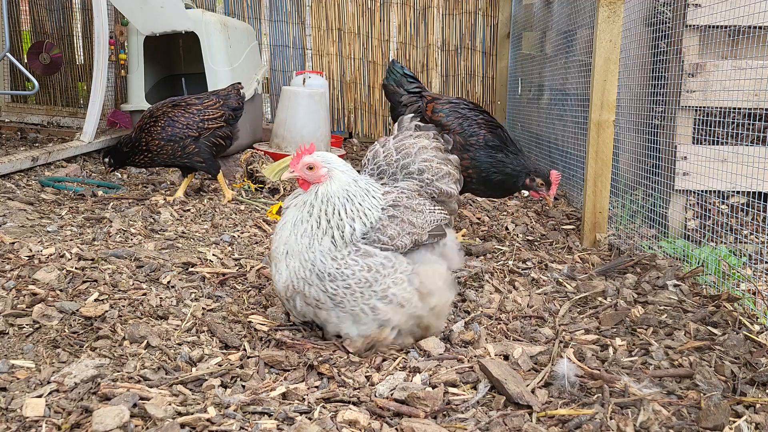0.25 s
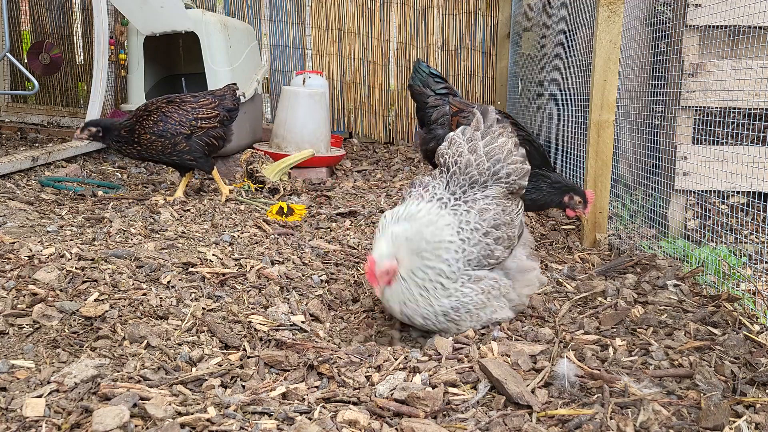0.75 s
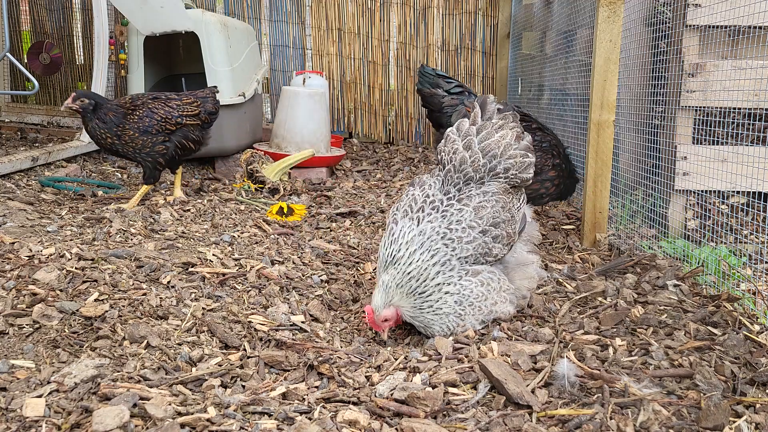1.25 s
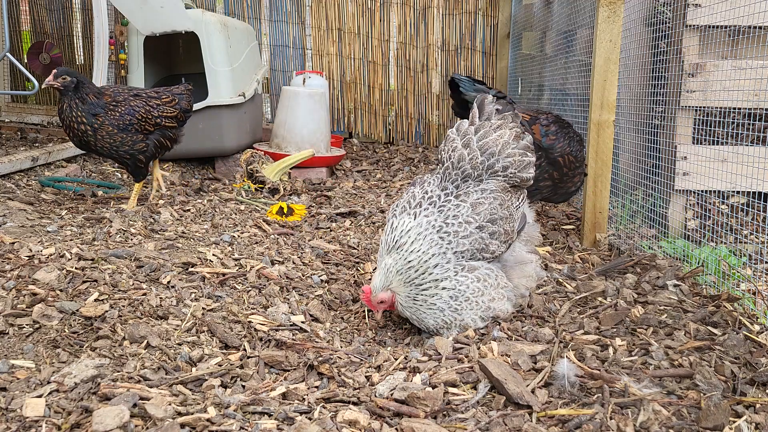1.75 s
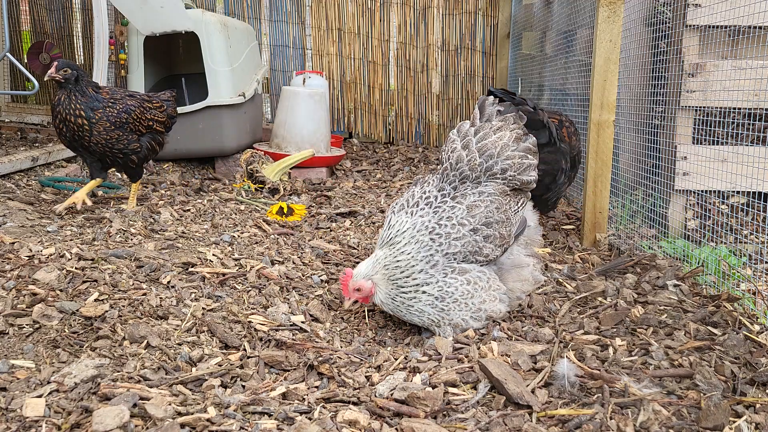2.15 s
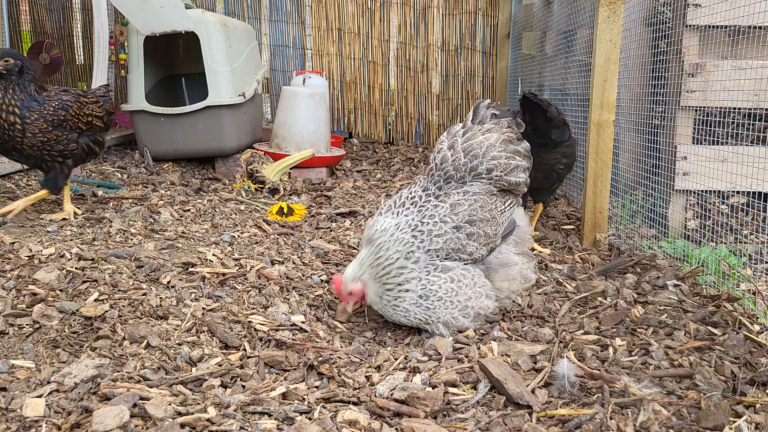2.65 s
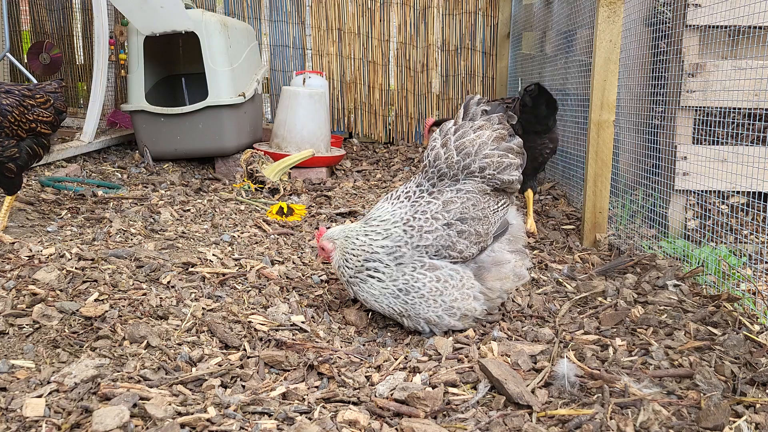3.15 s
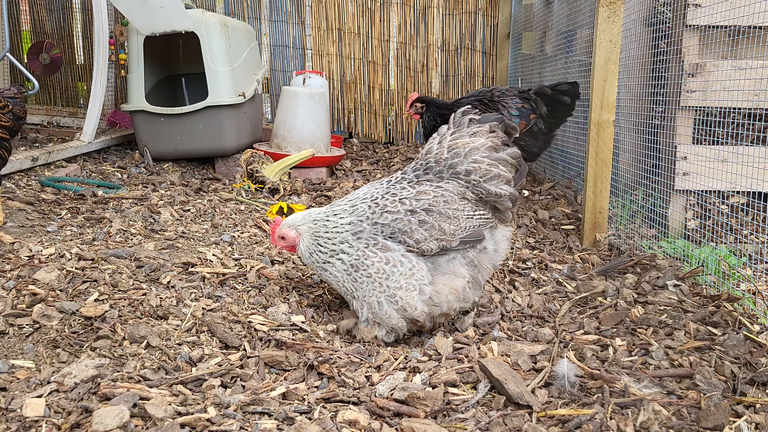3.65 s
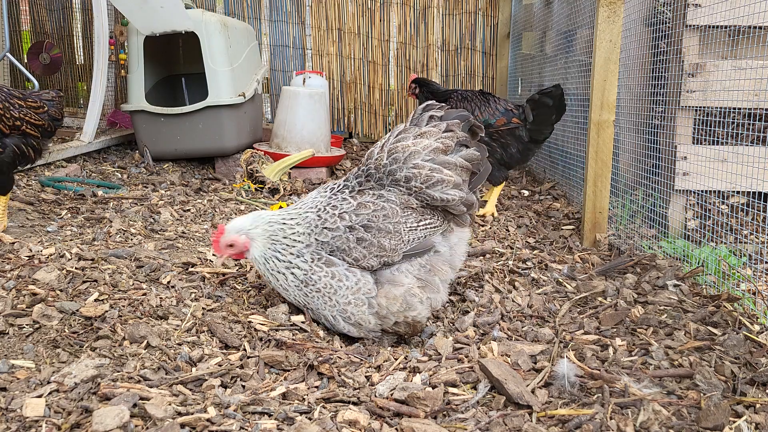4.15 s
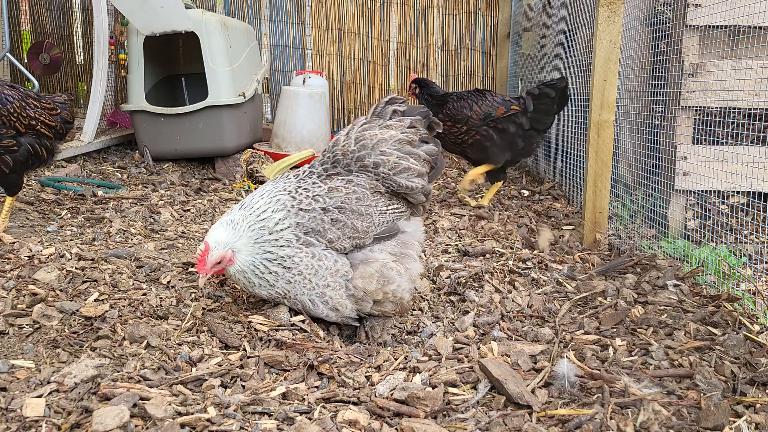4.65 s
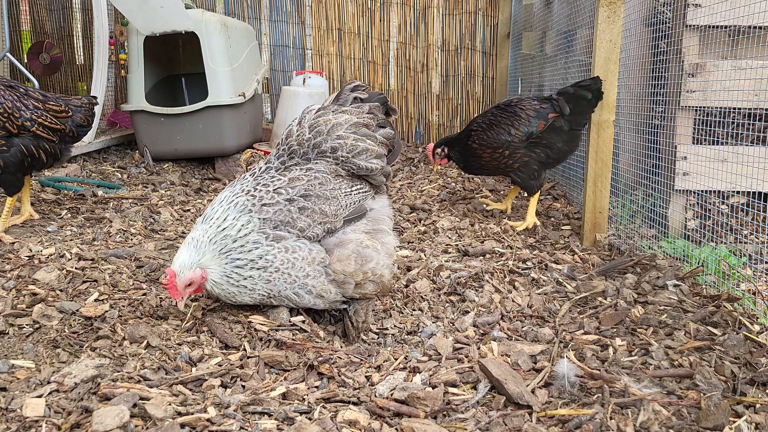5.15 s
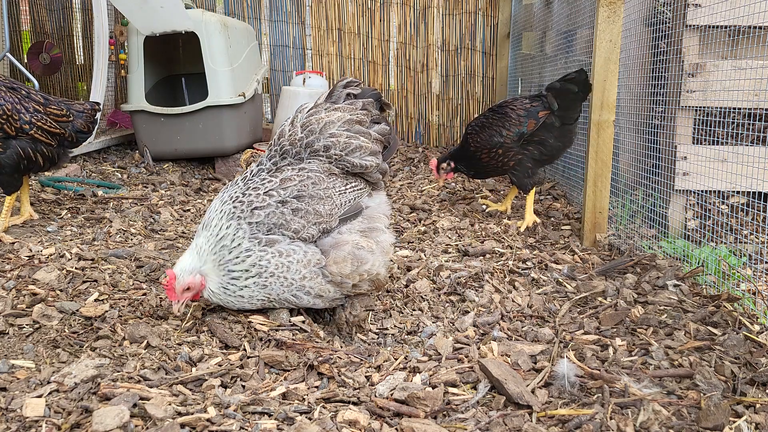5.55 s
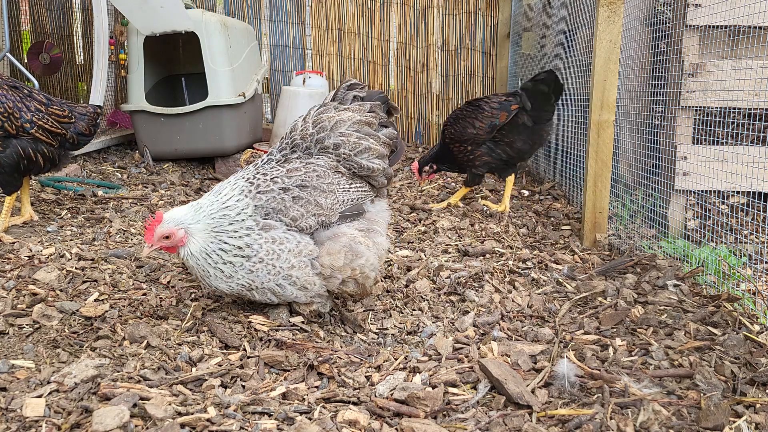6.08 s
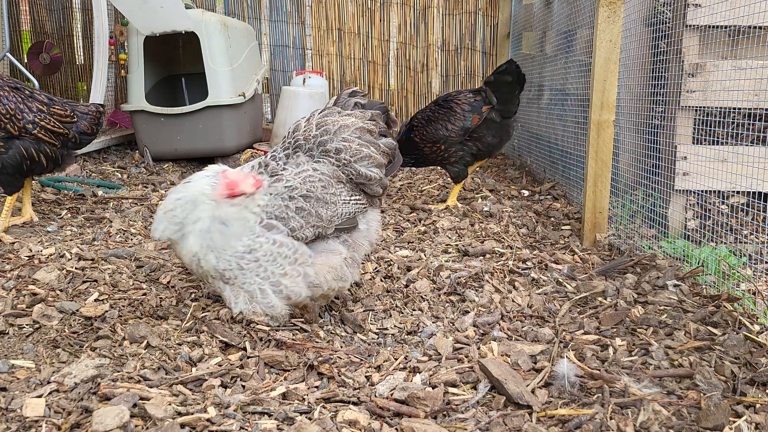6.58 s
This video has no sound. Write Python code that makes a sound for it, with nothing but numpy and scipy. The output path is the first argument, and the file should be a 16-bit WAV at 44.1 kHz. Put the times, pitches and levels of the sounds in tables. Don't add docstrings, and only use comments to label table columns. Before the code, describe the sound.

Crackly bursts of claws raking loose wood chips, a few soft hen peeps, and constant low electrical hum with distant town noise.

```python
import sys
import numpy as np
from scipy import signal
from scipy.fft import rfft, irfft, next_fast_len
from scipy.io import wavfile
from scipy.ndimage import uniform_filter1d

SR = 44100
rng = np.random.default_rng(int(sys.argv[2]) if len(sys.argv) > 2 else 0)


def level_to_linear(level):
    exponent = np.asarray(level, float) / 20
    return 10 ** exponent


def wrap_up_sound(samples):
    columns = np.atleast_2d(samples).T
    tamed = np.clip(columns, -1, 1)
    steps = np.round(tamed * 32767).astype(np.int16)
    wavfile.write(sys.argv[1], SR, steps)


N = 300757
T = np.arange(N) / SR
SIDES = np.array([[1], [-1]])
FAST = next_fast_len(N)
F = np.fft.rfftfreq(FAST, 1 / SR) + 1


def on_log(table, hz):
    f, v = np.transpose(table)
    return np.interp(np.log(hz), np.log(f), v)


def colour(x, table):
    closed = [(table[0][0] * 0.61, -90)] + list(table) + [(table[-1][0] * 1.5, -90)]
    y = irfft(rfft(x, FAST) * level_to_linear(on_log(closed, F)), FAST)[..., :N]
    return y / np.sqrt(np.mean(y ** 2))


def walk(rate):
    k = int(SR / rate)
    held = np.repeat(rng.standard_normal(N // k + 1), k)
    return .7 * uniform_filter1d(uniform_filter1d(held, k), k)[:N]


def pair(alike):
    mid, side = rng.standard_normal((2, N))
    return np.sqrt(1 + alike) * mid + SIDES * np.sqrt(1 - alike) * side


def shower(per_s, spread_db, tail_s, bed, alike):
    sizes = level_to_linear(np.minimum(spread_db * rng.exponential(size=N), 17))
    hits = (rng.random(N) < per_s / SR) * sizes
    env = signal.lfilter([1], [1, -np.exp(-1 / (tail_s * SR))], hits)
    return pair(alike) * (bed + env / np.sqrt(np.mean(env ** 2)))


def strokes(rows, rise_s=.1, fall_s=.1, bed_db=-120):
    swing_db, stop_db = 20, 4
    power, blend = np.full(N, level_to_linear(2 * bed_db)), np.zeros(N)
    for row in rows:
        rise, fall = np.maximum(row[2:4] if len(row) > 2 else (rise_s, fall_s), .002)
        at = slice(max(int((row[0] - 5 * rise) * SR), 0), int((row[0] + 5 * fall) * SR))
        late = T[at] - row[0]
        far = np.where(late < 0, -late / rise, late / fall)
        one = level_to_linear(2 * (row[1] - swing_db * far - stop_db * far ** 4))
        power[at] += one
        blend[at] += one * (row[4] if len(row) > 4 else 0)
    return 10 * np.log10(power), blend / power


# t/s, level/dB
HUM_LEVEL = [(0, -44), (2, -44.5), (4, -44), (5, -44), (6.82, -44.5)]
# multiple of the hum, level below it/dB
HUM_OVERTONES = [(2, -19.5), (3, -37.5), (4, -30.5), (6, -46)]


def hum():
    phase = 2 * np.pi * 100.03 * T
    tone = level_to_linear(0.13 * walk(6)) * np.sin(phase)
    for k, rel_db in HUM_OVERTONES:
        tone = tone + level_to_linear(rel_db + 1.8 * walk(1.5)) * np.sin(k * phase + rng.uniform(0, 2 * np.pi))
    return np.sqrt(2) * level_to_linear(np.interp(T, *np.transpose(HUM_LEVEL)) + SIDES * 0.23) * tone


# f/Hz, level/dB per Hz
TOWN_SPECTRUM = [(50, -23.5), (85, -4.5), (106, -11.5), (124, -13.5), (137, -13), (152, -20), (203, -19),
                 (249, -25), (305, -25.5), (350, -34), (401, -34), (554, -39), (990, -35.5), (1250, -42),
                 (1650, -47), (1900, -51), (5000, -58.5), (6500, -94.5), (11000, -120)]
# f/Hz, level/dB per Hz
AIR_SPECTRUM = [(2350, -22.5), (4000, -8), (5890, -6.5), (7380, -2.5), (8770, -10), (15100, -3.5),
                (15900, -11.5)]
# f/Hz, left minus right/dB
TOWN_LEAN = [(60, -5), (110, 3), (200, 2), (380, 3.5), (700, 3), (1290, 6), (2380, -0.5), (4400, 0),
             (8120, -5.5), (15000, -4.5)]
# f/Hz, share/0-1
TOWN_LIKENESS = [(100, 0.95), (290, 1), (640, 0), (1400, 0), (15000, 0)]
# t/s, mid-band swell/dB
TRAFFIC_SWELL = [(0, 5.5), (1, 2.5), (2, 5), (2.4, 5), (3, 4), (4.5, 3), (5.4, 1), (6.82, 1.5)]


def town():
    alike = np.clip(on_log(TOWN_LIKENESS, F), 0, 1)
    noise = rng.standard_normal((2, N))
    far_town = level_to_linear(-58.5) * colour(noise, TOWN_SPECTRUM)
    air = level_to_linear(-84) * colour(noise[:, ::-1], AIR_SPECTRUM)
    mid, side = rfft(far_town + air, FAST)
    both = np.sqrt(1 + alike) * mid + SIDES * np.sqrt(1 - alike) * side
    both = both * level_to_linear(SIDES * on_log(TOWN_LEAN, F) / 2)
    out, swell, traffic_db = 0, walk(0.25), np.interp(T, *np.transpose(TRAFFIC_SWELL))
    for hz in 88 * 2. ** np.arange(9):
        share = np.cos(np.pi / 2 * np.clip(np.log2(F / hz), -1, 1)) ** 2
        passing = np.exp(-np.log2(hz / 800) ** 2 / 4.4) * traffic_db
        out = out + level_to_linear(0.24 * swell + 1.6 * walk(8.8) + passing) * irfft(both * share, FAST)[:, :N]
    return out


def fine_dust():
    return shower(per_s=160, spread_db=-1.5, tail_s=0.0013, bed=2.2, alike=0.0528)


# peak t/s, level/dB, rise/s, fall/s
FAR_SHUFFLES = [(0, -60, .01, 0.0062), (.045, -72, 0.048, 0.68), (.172, -63, 0.059, 0.049),
                (.3, -72, .25, .03), (1.0, -78, .1, .2), (1.296, -77, .016, 0.7),
                (1.552, -72.5, 0.041, 0.19), (1.946, -71.5, 0.08, 0.11), (2.368, -74.5, 0.22, 0.091),
                (3.1, -77.5, .045, 0.39), (3.364, -78, 0.17, 0.12), (3.48, -77, 0.33, 0.045),
                (4.336, -78.5, .06, .09), (4.49, -73, 0.0094, .3), (5.64, -72.5, 0.026, 0.12),
                (5.804, -73, .02, 0.098), (5.99, -76.5, 0.22, 0.11), (6.204, -73.5, 0.28, 0.13),
                (6.608, -75.5, 0.14, 0.23), (6.82, -81.5, .03, 0.035)]


def shuffles():
    spectrum = [(4500, -15.0), (6000, -7.5), (7200, -1.0), (8200, -10.5), (11000, -13.5), (15500, -12.0)]
    level_db = strokes(FAR_SHUFFLES)[0] + 1.36 * walk(23) - SIDES * 2.2
    return level_to_linear(1.0 + level_db) * colour(fine_dust(), spectrum)


# f/Hz, level/dB per Hz
SOIL_SPECTRUM = [(11, -49.5), (18, -20.5), (46, 2.5), (70, 6), (82, -12.5), (92, -11), (120, -34),
                 (200, -120)]
# peak t/s, level/dB
FOOTFALLS = [(.06, -44), (.42, -52.5), (1.41, -53), (1.62, -48.5), (2.4, -45.5), (2.71, -63), (3.41, -60.5),
             (3.8, -46), (3.98, -47), (4.15, -48.5), (4.35, -48), (4.54, -50), (6.37, -55.5)]
# centre t/s, peak level/dB, f/Hz, half length/s
SOIL_THUMPS = [
    (2.35, -36.5, 55.4, .035),
    (2.398, -40, 62, .03),
    (3.765, -34.5, 139, 0.027),
    (3.797, -35.5, 70, 0.041),
    (3.828, -31, 68, 0.019),
    (3.872, -33, 123.5, 0.046),
    (3.955, -32.5, 94, 0.04),
    (4.025, -39.5, 65.6, .04),
    (4.165, -43, 130, .025),
]


def ground():
    deep_db = strokes(FOOTFALLS, rise_s=.2, fall_s=.2984, bed_db=-58)[0]
    deep = level_to_linear(deep_db + SIDES * .8) * colour(pair(0.88), SOIL_SPECTRUM)
    shake = uniform_filter1d(uniform_filter1d(rng.standard_normal((2, N)), size=900), size=300)
    for s, db, hz, length in SOIL_THUMPS:
        u = np.clip((T - s) / length, -1, 1)
        cycles = np.cos(2 * np.pi * hz * (T - s) + 18 * shake)
        deep = deep + level_to_linear(db) * np.cos(np.pi / 2 * u) ** 2 * cycles
    return deep


# t/s, peak level/dB, f/Hz, left minus right/dB
CHIP_SNAPS = [(0.0434, -51, 6800, -8), (0.049, -52.5, 7130, -2), (0.166, -43.5, 7380, -3),
              (0.2543, -48, 8450, -2), (0.2763, -50, 6500, -6), (0.3365, -46, 4840, 3),
              (0.3543, -38.5, 7900, 6), (0.4084, -37.5, 4890, 1), (0.453, -42, 5600, -1),
              (0.4884, -48, 7800, -3.5), (0.5501, -38.5, 5300, -3.5), (0.5592, -35.5, 7700, -1),
              (0.596, -40, 11900, -12.5), (0.627, -48, 8000, -4.5), (0.6742, -29.5, 6240, -2),
              (0.7505, -41, 5380, -4), (0.7857, -38, 7010, 5), (0.8204, -38, 7300, 2),
              (2.7785, -43.5, 6600, -4), (3.5627, -41.5, 7300, 0), (3.6014, -34.5, 6600, -4),
              (3.7012, -30.5, 6870, -15), (3.9148, -40.5, 7440, 2), (4.1004, -53, 6200, -8),
              (4.54, -48.5, 4800, -1), (5.028, -45, 5650, -8.5), (5.0343, -40.5, 5360, -4),
              (5.639, -57, 7250, -8), (5.8022, -61.5, 7100, -11), (6.6122, -57.5, 7530, -2.5)]
# t/s, peak level/dB, f/Hz, left minus right/dB
FAINT_SNAPS = [
    (0.1426, -56, 6050, -8),
    (2.687, -59, 2020, -4),
    (2.7315, -58, 1820, -3),
    (2.74, -59, 2150, 5.0),
    (3.3522, -60, 6810, -12),
    (5.333, -68, 6470, -3),
]
# t/s, peak level/dB, f/Hz, left minus right/dB
FINE_TICKS = [(0.3797, -43, 7670, -3), (0.4292, -37, 7000, -1), (0.439, -41.5, 7730, -2.0),
              (0.4693, -41, 5390, -5.5), (0.4692, -35, 7240, -5), (0.5177, -41, 7730, -4.5),
              (0.5911, -37, 7520, 1), (0.6894, -44.5, 5470, -2.5), (0.8007, -41, 5990, -1.5),
              (0.82, -36, 7430, -1.0), (2.6958, -53, 7260, -3), (2.7194, -55, 5830, -0.5),
              (3.6291, -36, 7480, -1.5), (3.8394, -36, 4370, -2), (4.5888, -34, 5470, -7),
              (4.6285, -34.5, 4860, -4), (4.6444, -47, 5850, -2), (4.6994, -47, 4520, -3.5),
              (4.9095, -48.5, 6920, -1.5), (5.0087, -55, 6780, -2.0), (5.0744, -51.5, 5650, -2.5),
              (5.1033, -54, 4230, -3), (5.1596, -50, 7870, -1.5)]
# t/s, peak level/dB, f/Hz, left minus right/dB
SPLINTER_TICKS = [
    (0.4494, -45.5, 13300, -6.5),
    (0.4878, -50, 11600, -5.5),
    (0.5452, -39.5, 12200, -8),
    (0.6034, -41, 12200, -4),
    (3.9245, -42.5, 13200, -7),
    (4.6094, -38.5, 12200, -14),
]


def snaps():
    out, t = np.zeros((2, N + 2000)), np.arange(1500) / SR
    ticks = [(s, db - 1.5, hz, pan_db) for s, db, hz, pan_db in FINE_TICKS + SPLINTER_TICKS]
    rows = CHIP_SNAPS + FAINT_SNAPS + ticks
    lags = rng.integers(-2, 3, len(rows))
    for (s, db, hz, pan_db), lag in zip(rows, lags):
        cycles = t * hz / .85
        push = cycles * np.exp(1 - cycles)
        rattle = 0.23 * np.exp(-t / 0.005) * uniform_filter1d(rng.standard_normal((2, len(t))), size=5)
        click = (push + rattle) * np.sin(2 * np.pi * hz * t)
        for side in range(2):
            at = max(int((s + .0009) * SR) + side * lag, 0)
            out[side, at:at + len(t)] += level_to_linear(db + 3.5 + SIDES[side, 0] * pan_db / 2) * click[side]
    return out[:, :N]


# t/s, length/s, f/Hz, level/dB, octave minus first partial/dB
SOFT_PEEPS = [
    (.155, .04, 1100, -75, -30),
    (1.96, .34, 555, -80, -30),
    (2.154, .024, 960, -67, -30),
    (2.158, .036, 948, -76, 7),
    (2.194, .02, 930, -69, -11),
    (2.646, .04, 894, -84.5, 14),
    (2.91, .045, 1060, -73, -25),
    (3.93, .065, 622, -55, -30),
    (5.209, .052, 1045, -63.5, -15),
    (5.263, .02, 1000, -72, -2),
]


def peeps():
    out, shake = np.zeros(N), walk(210)
    for s, length, hz, db, octave_db in SOFT_PEEPS:
        u = np.arange(int(length * SR)) / (length * SR)
        at = slice(int(s * SR), int(s * SR) + len(u))
        pitch = hz * (1 - .012 * u) * (1 + .008 * shake[at])
        phase = 2 * np.pi * np.cumsum(pitch) / SR
        swell = np.sin(np.pi * u ** .4) ** .7
        first = level_to_linear(3.5 * shake[::-1][at]) * np.sin(phase)
        upper = level_to_linear(octave_db) * 2 * u * (np.sin(2 * phase) + level_to_linear(-22) * np.sin(4 * phase))
        out[at] += level_to_linear(db + 4) * swell * (first + upper)
    return out * level_to_linear(2.5 * walk(120) + SIDES * 5.4)


# peak t/s, level/dB, rise/s, fall/s
HEN_MUTTERS = [
    (.17, -73, .06, 0.07),
    (1.1, -71, .2, 0.26),
    (1.3, -71, 0.17, .25),
    (2.17, -66, .1, 0.16),
    (2.95, -65, 0.13, 0.14),
    (4.15, -76.5, 0.094, 0.28),
    (5.3, -83, .1, 0.26),
    (6.1, -79.5, 0.14, 0.21),
    (6.5, -80, .2, .2),
]
# f/Hz, level/dB per Hz
MUTTER_SPECTRUM = [(780, -9), (900, 2.5), (1000, 1), (1100, -4), (1250, -15), (1600, -11.5), (1800, -23)]


def mutters():
    level_db = strokes(HEN_MUTTERS)[0] - 1.5 + 2.2 * walk(30)
    return level_to_linear(level_db) * colour(pair(0.3), MUTTER_SPECTRUM)


# t/s, peak level/dB, f/Hz, ring t60/s, left minus right/dB
CHIP_RINGS = [(.588, -40, 7820, 0.021, 2), (3.676, -38, 5830, .06, -7), (3.711, -25, 2040, 0.045, -3.5),
              (3.7171, -22, 1880, 0.038, -3.5), (3.7208, -28.5, 7000, .05, -6),
              (3.7244, -22.5, 2430, 0.045, -3), (3.7284, -16.5, 2153, .06, -2.5),
              (3.741, -16.5, 2025, 0.036, -1), (3.751, -29, 1530, .05, -0.5),
              (3.9524, -43.5, 4825, .03, -5), (4.5458, -48, 6995, 0.018, -3.5),
              (4.5708, -39, 7180, .02, -8), (4.7915, -29, 1864, 0.035, -5),
              (4.7944, -29.5, 1704, 0.058, -5), (4.807, -38, 1850, 0.033, -5),
              (4.826, -31, 1600, 0.036, -1), (4.809, -34, 7290, 0.043, 0), (4.889, -36, 6000, 0.014, -6),
              (5.136, -46.5, 4002, 0.04, -3), (5.2726, -51, 3880, 0.052, -5)]
# t/s, peak level/dB, f/Hz, ring t60/s, left minus right/dB
CHIP_PINGS = [(.2548, -50, 8200, .02, -4), (.2763, -52, 6600, .015, -4), (.437, -39, 7600, .01, -2),
              (.453, -38, 7600, .01, -1.5), (.4805, -43, 5400, .008, -2), (.4879, -42, 11600, .015, -5),
              (.4909, -37, 7500, .015, -3), (.5448, -45, 12300, .012, -6), (.5448, -47, 14000, .012, -2),
              (.5952, -41, 13600, .012, -4), (.683, -42, 6500, .008, -2), (.8092, -39, 7000, .01, -2),
              (.8092, -46, 14300, .01, -3), (3.9245, -42, 14500, .03, -4), (3.944, -40, 13500, .008, -4),
              (4.029, -52.5, 6000, .008, -4), (4.054, -50, 5800, .008, -4), (4.5722, -42, 13000, .015, -8),
              (4.6226, -35, 14900, .02, -6), (4.7198, -45, 5600, .015, -2.5), (4.879, -44, 2000, .02, -2),
              (5.043, -45, 6500, .008, -4), (4.112, -53, 6300, .015, -6), (2.85, -62, 6500, .012, -4),
              (3.733, -22, 1990, .03, -2), (5.072, -49, 2000, .02, 0), (5.1104, -53, 2990, .015, -2)]


def rings():
    out, t = np.zeros((2, N + 5000)), np.arange(4400) / SR
    for s, db, hz, t60, pan_db in CHIP_RINGS + CHIP_PINGS:
        shiver = uniform_filter1d(rng.standard_normal(len(t)), size=90)
        tone = np.sin(2 * np.pi * hz * t + 4.0 * shiver)
        tone = tone * (1 - np.exp(-t / 0.001)) * level_to_linear(-60 * t / max(t60, .005))
        at = int(s * SR)
        out[:, at:at + len(t)] += level_to_linear(db - 2.0 + SIDES * pan_db / 2) * tone
    return out[:, :N]


# peak t/s, grain level/dB, rise/s, fall/s, dust minus grains/dB
LIGHT_SCRATCHES = [(.277, -64, 0.0064, 0.056, -3), (.345, -53.5, 0.027, 0.36, -4.5),
                   (.438, -53, 0.16, 0.16, -2), (.53, -59.5, .03, .1, -2), (.566, -60.5, .1, 0.32, -3),
                   (.63, -56, .005, 0.14, -2), (.68, -54.5, 0.079, 0.13, -6.5),
                   (.786, -54, .004, 0.074, -9), (.82, -55.5, 0.076, 0.067, 0), (.86, -65.5, .05, 0.12, -1),
                   (2.702, -64, 0.032, 0.14, 0.5), (2.778, -77, .02, .06, -1),
                   (2.81, -76, 0.056, 0.36, -0.5)]
# peak t/s, grain level/dB, rise/s, fall/s, dust minus grains/dB
HARD_KICKS = [(3.575, -55.5, 0.064, 0.086, -7.5), (3.603, -45, 0.022, 0.25, -3.5),
              (3.685, -58, .06, 0.05, -13.5), (3.703, -39.5, 0.0031, .06, -4),
              (3.725, -30.5, 0.024, 0.098, -8), (3.77, -40, .06, 0.067, -8.5),
              (3.849, -51, 0.055, 0.078, -2.5), (3.918, -56, 0.0098, 0.099, 3),
              (3.961, -49, 0.038, 0.0615, -6), (4.04, -64.5, 0.067, .12, -9.5),
              (4.102, -64.5, 0.0062, 0.088, -8.5), (4.58, -48.5, 0.046, 0.14, -2),
              (4.625, -52, 0.083, 0.29, -1.5), (4.78, -55.5, 0.16, .03, -9.5),
              (4.802, -41, 0.018, 0.057, -5), (4.84, -56.5, 0.06, 0.33, 1), (4.995, -62, .02, .03, -4),
              (5.035, -49, .012, 0.045, -8), (5.145, -58, 0.09, .125, -1.5),
              (5.272, -67, 0.06, 0.116, -1.5), (5.33, -75.5, .02, 0.071, -3)]
# f/Hz, level/dB per Hz
GRAIN_SPECTRUM = [(2650, -32), (4500, -4), (4840, 1), (7580, 3), (7870, 0.5), (8800, -24), (11400, -34.5),
                  (19400, -120)]
# f/Hz, level/dB per Hz
COARSE_SPECTRUM = [(2700, -15), (3080, -0.5), (3800, 1), (4600, -4)]
# f/Hz, level/dB per Hz
DUST_SPECTRUM = [(4880, -31), (8300, -3), (9140, -3), (11800, -0.5), (14300, -0.5), (15100, 2),
                 (16000, -6.5)]
# f/Hz, level/dB per Hz
PACKED_SPECTRUM = [(2900, -2), (3500, -1.5), (4300, -2.5), (5500, -6), (7000, -5.5), (7800, -8.5),
                   (8300, -26)]


def rustle():
    grain_db, dust_db = strokes(LIGHT_SCRATCHES + HARD_KICKS)
    pan_db = -3 - .11 * (grain_db + 55)
    coarse_db = np.minimum(-1 + 0.6 * (strokes(CLAW_DRAGS)[0] - grain_db), -1.2)
    fall = shower(per_s=1100, spread_db=2.9, tail_s=.0004, bed=1.35, alike=.12)
    dust = fine_dust()
    hard = np.clip((grain_db + 47) / 8, 0, 1)
    light = colour(fall, GRAIN_SPECTRUM) + level_to_linear(coarse_db) * colour(fall, COARSE_SPECTRUM)
    dense = level_to_linear(3.5) * colour(dust[:, ::-1], PACKED_SPECTRUM)
    fine = level_to_linear(dust_db) * colour(dust + 0.86 * fall, DUST_SPECTRUM)
    mix = np.sqrt(1 - hard) * light + np.sqrt(hard) * dense + fine
    return level_to_linear(1.5 + grain_db + 2.1 * walk(45) + SIDES * pan_db / 2) * mix


# peak t/s, level/dB, rise/s, fall/s, left minus right/dB
CLAW_DRAGS = [(.358, -68, 0.057, .2, 1), (.434, -66, .12, 0.22, 3), (.646, -69, 0.12, 0.29, 5),
              (.808, -66, 0.072, .115, 4), (2.685, -84.5, 0.008, 0.22, 32), (2.742, -82, .1, 0.063, 22),
              (3.62, -53, 0.049, 0.072, 3), (3.704, -40.5, 0.0014, .06, -5),
              (3.718, -28.5, 0.0086, 0.085, -4.5), (3.734, -27, 0.017, 0.1, 1.5),
              (3.772, -39, 0.041, 0.19, 0), (3.972, -52.5, 0.12, 0.072, -2.5), (4.02, -68, 0.056, .15, 9.5),
              (4.59, -64, 0.078, 0.27, 0), (4.64, -65.5, 0.12, 0.42, 2), (4.796, -38, 0.0054, 0.063, 1),
              (4.83, -42, 0.03, 0.058, 1), (4.885, -55.5, .06, 0.13, 0), (5.149, -62, 0.26, 0.072, 4),
              (5.257, -74, 0.16, 0.1, 6)]
# peak t/s, level/dB, rise/s, fall/s
LITTER_BOOMS = [(.358, -64.5, 0.14, .08), (.434, -66.5, .12, 0.31), (.646, -66.5, 0.22, .4),
                (.808, -71, 0.36, 0.27), (2.69, -66, 0.0068, 0.21), (2.742, -74, 0.18, 0.075),
                (3.622, -77, 0.035, .3), (3.73, -39, 0.022, 0.14), (3.772, -35, 0.052, 0.22),
                (3.972, -51, 0.35, 0.062), (4.05, -57, 0.11, 0.4), (4.62, -71, 0.31, 0.21),
                (4.823, -49, 0.039, 0.07), (4.9, -56, 0.092, 0.22), (5.15, -69, 0.25, 0.29)]
# f/Hz, level/dB per Hz
CHIP_SPECTRUM = [(710, -37), (1200, -14), (1440, -7), (1500, -4.5), (1670, -6), (1730, -5.5), (2120, -4),
                 (2310, -7.5), (2900, -9.5), (3770, -27.5), (6380, -120)]
# f/Hz, level/dB per Hz
KNOCK_SPECTRUM = [(1250, -21), (1500, -7), (1750, -1), (2000, -2), (2250, -7), (3100, -11)]
# f/Hz, level/dB per Hz
HOLLOW_SPECTRUM = [(140, -29.5), (240, -12.5), (334, -8.5), (444, -2.5), (492, -6.5), (622, -3.5),
                   (651, -10.5), (720, -18.5), (940, -50), (1580, -120)]


def scrape():
    chips_db, pan_db = strokes(CLAW_DRAGS)
    hollow_db = strokes(LITTER_BOOMS)[0]
    clatter = shower(per_s=1200, spread_db=0.5, tail_s=.003, bed=1.1, alike=0.16)
    clatter[0] = np.roll(clatter[0], 20)
    second_kick = (T > 4.785) & (T < 4.87)
    chips = np.where(second_kick, colour(clatter, KNOCK_SPECTRUM), colour(clatter, CHIP_SPECTRUM))
    loose = shower(per_s=257.0, spread_db=2.5, tail_s=0.018, bed=1.5, alike=0.4)
    upper_db = 0.44 * hollow_db + 0.42 * chips_db - 10.5
    upper = level_to_linear(upper_db) * colour(loose, [(740, -0.84), (950, 2.0), (1250, 1.0)])
    boom = level_to_linear(1.45 + hollow_db) * colour(loose, HOLLOW_SPECTRUM)
    return level_to_linear(4.0 + chips_db + SIDES * pan_db / 2) * chips + boom + upper


def scene():
    background = hum() + town() + shuffles()
    hens = peeps() + mutters()
    return background + ground() + snaps() + hens + rings() + rustle() + scrape()


def top_cut(x):
    return signal.sosfilt(signal.butter(12, 15870, fs=SR, output="sos"), x)


def record(dry):
    low_pass = signal.ellip(10, .3, 70, 15820, fs=SR, output="sos")
    cut = signal.sosfilt(low_pass, dry)
    return top_cut(cut)


dry = scene()
out = record(dry)
wrap_up_sound(out)
```